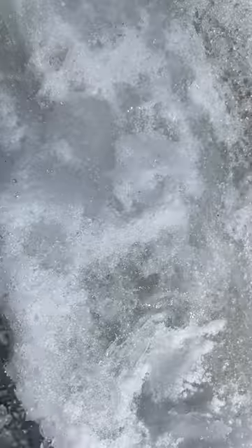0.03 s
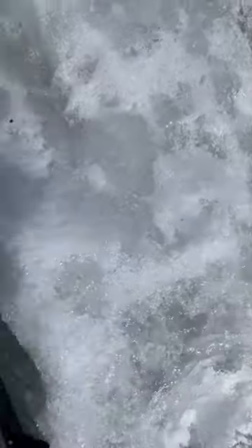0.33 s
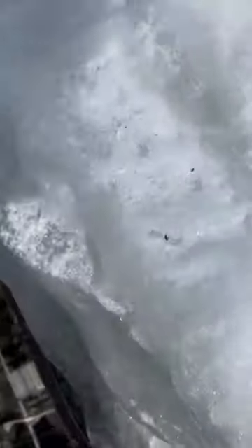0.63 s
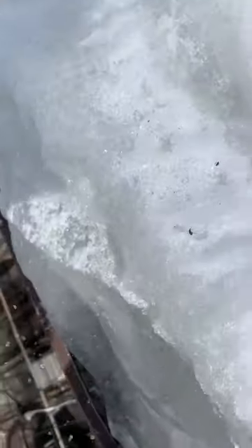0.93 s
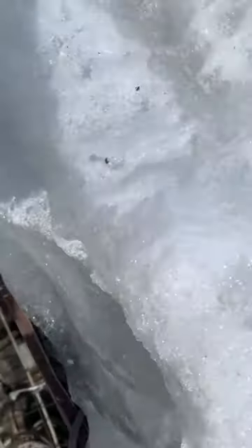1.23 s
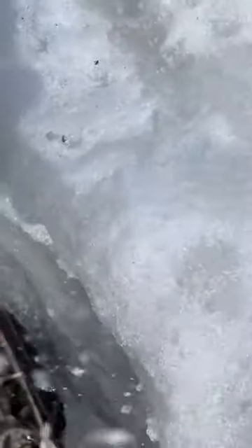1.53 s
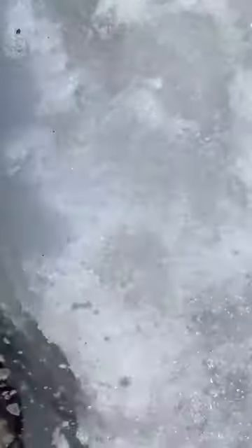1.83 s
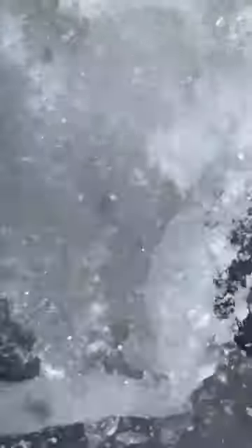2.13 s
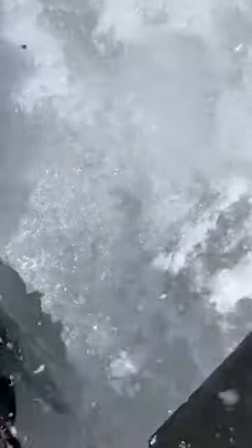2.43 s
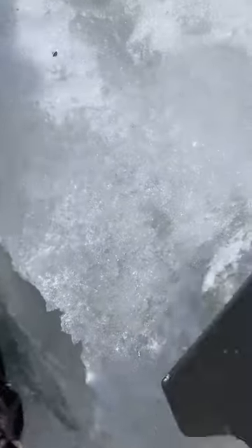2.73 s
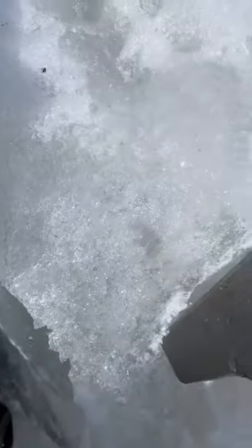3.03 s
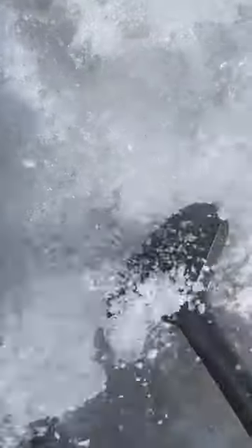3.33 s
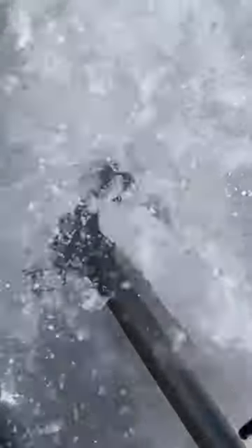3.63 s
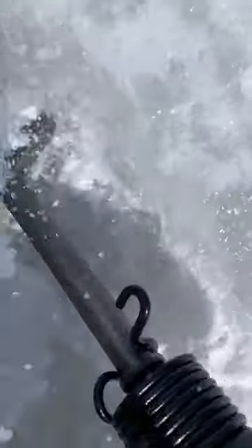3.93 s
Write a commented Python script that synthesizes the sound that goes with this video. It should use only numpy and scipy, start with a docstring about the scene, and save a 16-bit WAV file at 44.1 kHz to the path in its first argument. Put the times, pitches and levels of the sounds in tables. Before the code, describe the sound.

An air chisel rattles harshly into ice, pauses as crumbs fall, then restarts.

```python
"""A pneumatic chisel hammers thick ice, mostly at 65-85 blows a second; it falters, stops and restarts.
Each blow cracks the ice, puffs out air and rings the steel: a short clink when the blade is seated,
a shrill ring when it is free. In the pause crumbs tick down and grit slides; on the restart a slab drops.
Heard outdoors on a pair of microphones, the left one leading, with an engine humming in the distance."""
import sys
import numpy as np
from scipy import signal
from scipy.fft import rfft, irfft
from scipy.io import wavfile
from scipy.ndimage import uniform_filter1d

SR = 44100
rng = np.random.default_rng(int(sys.argv[2]) if len(sys.argv) > 2 else 0)


def unload_wav(signal):
    """Save mono or channel-first audio to the path in sys.argv[1] as 16-bit WAV at rate SR, clipped to [-1, 1]."""
    wavfile.write(
        sys.argv[1],
        SR,
        np.round(np.clip(np.atleast_2d(signal).T, -1, 1) * 32767).astype(np.int16),
    )


N = 176400
T, HZ = np.arange(N) / SR, np.fft.rfftfreq(N, 1 / SR)
# how far the left microphone leads the right (frequency [Hz], phase [rad])
LEFT_LEAD = [(0, 0), (500, 0), (1200, 1.4), (2500, 2.5), (3600, 1.8), (4700, 3.14), (6650, 6.28),
             (7400, 6.8), (8900, 9.42), (10900, 12.57), (11600, 13.3), (13100, 15.7), (15100, 18.85),
             (16000, 19.3)]
# strength of the exhaust, one list for each run of the chisel (time [s], relative level [dB])
EXHAUST_LEVEL = [
    [(0.04, -39), (0.62, -46), (0.69, -37.5), (0.82, -40.5), (0.91, -52), (1.05, -34.5), (2.22, -36),
     (2.27, -66)],
    [(3.135, -67), (3.149, -43.5), (3.169, -28), (3.271, -27), (3.283, -34), (3.99, -37)],
]
# strength of the cracking, one list for each run (time [s], relative level [dB])
CRACK_LEVEL = [
    [(0.04, -40), (0.52, -51), (0.77, -39), (0.91, -59.5), (1.05, -36.5), (2.21, -40), (2.27, -70)],
    [(3.135, -63), (3.181, -28), (3.213, -38.5), (3.641, -33), (3.773, -38), (3.99, -35)],
]


def amp(db):
    """Decibels to gain."""
    return 10 ** (np.asarray(db) / 20)


def unit_rms(x):
    """Scales to rms 1."""
    return x / np.sqrt(np.mean(x ** 2) + 1e-20)


def curve(rows, t, column=1):
    """Interpolates one column of a table at t."""
    rows = np.array(rows)
    return np.interp(t, rows[:, 0], rows[:, column])


def since(start):
    """Seconds since start; zero before it."""
    return np.maximum(T - start, 0)


def over_hz(points):
    """Interpolates a table on a log-frequency axis."""
    hz, value = np.transpose(points)
    return np.interp(np.log(HZ + 1), np.log(hz), value)


def coloured(x, spectrum):
    """Gives a white sound a spectrum and keeps its power."""
    return irfft(rfft(x) * unit_rms(amp(over_hz(spectrum))), N)


def noise(grain_db=0, size=14):
    """Two unrelated noises that share grains of uneven strength."""
    grains = np.repeat(rng.standard_normal(N // size + 1), size)[:N]
    return unit_rms(rng.standard_normal((2, N)) * amp(grain_db * np.minimum(grains, 2.5)))


def microphones(x):
    """Two noises reach the pair partly alike, the left leading."""
    # likeness of the channels (frequency [Hz], coherence [0-1])
    likeness = [(40, .985), (100, .95), (200, .88), (380, .7), (700, .2), (1500, .2), (2600, .5),
                (3800, .7), (4700, .93), (6000, .85), (9000, .95), (11000, .9), (13100, .93), (15500, .92)]
    same = np.clip(over_hz(likeness), 0, 1)
    left, other = rfft(x)
    right = (same * left + np.sqrt(1 - same ** 2) * other) * np.exp(-1j * curve(LEFT_LEAD, HZ))
    return irfft(np.array([left, right]), N)


def direct(x):
    """One clean sound as it reaches both microphones."""
    return np.array([x, irfft(rfft(x) * np.exp(-1j * curve(LEFT_LEAD, HZ)), N)])


def still_air():
    """The faint, low hush of the open air."""
    # (frequency [Hz], relative density [dB])
    spectrum = [(20, 4.5), (70, 3.5), (200, -11.5), (600, -14.5), (2000, -20.5), (15000, -29.5)]
    return amp(-73.5) * coloured(noise(), spectrum)


def engine(hz=60.2):
    """A distant engine hums at a steady speed."""
    # engine orders (multiple, relative level [dB])
    orders = [(1, -70), (2, -77), (3, -77), (5, -74.5), (6, -84), (7, -81.5), (8, -79.5), (9, -87.5)]
    # swell of the hum (time [s], gain [dB])
    level = [(.03, -27), (.15, -2.5), (2.7, -4), (2.9, 1.5), (3.1, 0.5)]
    hum = sum(amp(db) * np.sin(2 * np.pi * (order * hz * T + rng.random())) for order, db in orders)
    return np.sqrt(2) * hum * amp(curve(level, T))


def piston(jitter_s=.00012, early_s=.0006):
    """One blow a cycle. Returns the blow times and, for every sample, the last blow and its age."""
    # hammer speed, one list for each run (time [s], rate [blows/s])
    paces = [
        [(0.0355, 83.3), (0.076, 64.9), (0.196, 85.2), (0.467, 68.8), (0.623, 86.5), (0.659, 75.7),
         (0.777, 80.3), (0.881, 31.9), (1.003, 68.6), (1.079, 87.0), (1.188, 77.3), (1.227, 82.9),
         (1.346, 66.9), (1.387, 74.3), (1.511, 72.8), (1.641, 65.1), (2.007, 66.5), (2.1, 62.2), (2.144, 74.1),
         (2.265, 40.8)],
        [(3.133, 50.0), (3.18, 79.4), (3.384, 67.0), (3.426, 72.7), (3.516, 62.9), (3.981, 65.9)],
    ]
    times = []
    for pace in paces:
        t = np.arange(pace[0][0], pace[-1][0] + .006, 1 / SR)
        cycles = np.cumsum(curve(pace, t)) / SR
        times.extend(np.interp(np.arange(int(cycles[-1]) + 1), cycles, t))
    times = np.array(times) + scatter(times, jitter_s) - early_s
    last = np.maximum(np.searchsorted(times, T) - 1, 0)
    return times, last, since(times[last])


def scatter(times, spread):
    """One random offset for each blow."""
    return spread * rng.standard_normal(len(times))


def release(age):
    """A blow dies away if no other follows within 16 ms."""
    return np.exp(-np.maximum(age - .016, 0) / .006)


def levelled(blows, shape, runs, scatter_db):
    """Sets the rms of each blow's first 15 ms by a level table and the blade's grip."""
    # the blade slips or bites harder (time [s], half length [s], gain [dB])
    grips = [(0.471, 0.02, -12.5), (0.682, 0.02, 2), (0.966, 0.0065, 9.5)]
    times, last, age = blows
    grip_db = sum(db * np.exp(-((times - at) / half) ** 4) for at, half, db in grips)
    level_db = curve(runs[0] + runs[1], times + .0044) + grip_db + scatter(times, scatter_db)
    working = (age > 0) & (age < .015)
    power = np.bincount(last, shape ** 2 * working) / np.bincount(last, working)
    return (amp(level_db) / np.sqrt(power + 1e-20))[last] * shape * release(age)


def exhaust_swell(age, peak_s=.0054):
    """The rise and fall of the air vented on one blow."""
    return age / peak_s * np.exp(-(age / peak_s) ** 2 / 2)


def exhaust_puff(blows, top_hz=982, end_hz=174.2, sag_s=.003136):
    """Each blow vents a puff of air whose pitch falls fast."""
    times, last, age = blows
    envelope = amp(-4.5) * levelled(blows, exhaust_swell(age), EXHAUST_LEVEL, scatter_db=1.3)
    cycles = end_hz * age + (top_hz - end_hz) * sag_s * (1 - np.exp(-age / sag_s))
    detune = 1 + scatter(times, .04)[last]
    return envelope * np.sqrt(2) * np.sin(2 * np.pi * cycles * detune)


def breaking_ice(blows, grain_db=5.5):
    """Each blow gives a rumble, a knock, a crack, a treble burst and a spray of air and ice dust."""
    # spectra of these five (frequency [Hz], relative density [dB])
    rumble_colour = [(20, -20.5), (40, -2.5), (56, -3), (90, -0.5), (140, 0.5), (300, -7), (500, -3.5),
                     (900, -14.5), (3000, -55)]
    knock_colour = [(200, -19.5), (450, -6), (650, 4), (1100, 1.5), (1400, -5.5), (2000, -45.5),
                    (5000, -56.5)]
    crack_colour = [(700, -35), (1400, 0.5), (1900, 1), (2600, -1.5), (3800, 1), (4800, -9.5), (6000, -4),
                    (9000, -25.5)]
    treble_colour = [(3500, -72.5), (5300, -1), (6800, 0), (7350, 6.5), (8000, 2.5), (9300, -13.5),
                     (10800, 6), (12300, 4), (14000, -6.5)]
    spray_colour = [(11500, -36), (13900, -5), (15500, -8)]
    # strength of knock and treble, one list for each run (time [s], relative level [dB])
    knock_level = [
        [(0.04, -45.5), (0.25, -40.5), (0.84, -51.5), (0.87, -79.5), (1.07, -37), (2.21, -40.5), (2.27, -79.5)],
        [(3.135, -88), (3.16, -33.5), (3.223, -39), (3.693, -36.5), (3.811, -39.5), (3.99, -36)],
    ]
    treble_level = [
        [(0.04, -41.5), (0.86, -46), (0.89, -57.5), (1.05, -37.5), (2.2, -37), (2.27, -61.5)],
        [(3.135, -58.5), (3.153, -35), (3.547, -34), (3.583, -31.5), (3.907, -37.5), (3.99, -35.5)],
    ]
    # lift of the spray over treble_level (time [s], gain [dB])
    spray_lift = [(.8, 11), (1.05, 1.9)]
    times, last, age = blows

    def burst(level, fade_s, crumble, scatter_db):
        """A sharp fracture with a crumbling tail."""
        shape = (1 - np.exp(-age / .0016)) * (np.exp(-age / fade_s) + crumble * np.exp(-age / .038))
        return levelled(blows, shape, level, scatter_db)

    def recurring(share, grain_db=0):
        """Noise that partly recurs on each blow and changes slowly as the blade digs in."""
        shapes = signal.lfilter([1], [1, -.9], rng.standard_normal((2, len(times), 1024)), axis=1)
        again = unit_rms(shapes[:, last, np.round(age * SR).astype(int) % shapes.shape[2]])
        return np.sqrt(share) * again + np.sqrt(1 - share) * noise(grain_db)

    held_swell = exhaust_swell(age) + .35 * (age > 0)
    rumble = recurring(.35) * levelled(blows, held_swell, EXHAUST_LEVEL, scatter_db=1.8)
    knock = recurring(.55) * burst(knock_level, fade_s=.0019, crumble=.09, scatter_db=.5)
    crack = recurring(.3, grain_db) * burst(CRACK_LEVEL, fade_s=.0012, crumble=.2, scatter_db=1.4)
    treble = noise(grain_db) * burst(treble_level, fade_s=.0018, crumble=.23, scatter_db=2.5)
    spray = noise(grain_db) * burst(treble_level, fade_s=.0012, crumble=.14, scatter_db=2)
    return (amp(-1) * coloured(rumble, rumble_colour)
            + amp(-.5) * coloured(knock, knock_colour)
            + amp(4.5) * coloured(crack, crack_colour)
            + amp(7.5) * coloured(treble, treble_colour)
            + amp(curve(spray_lift, T)) * coloured(spray, spray_colour))


def chatter(rough):
    """The steel rattles against the ice, which shakes the level and phase of its tone."""
    real, imaginary = unit_rms(uniform_filter1d(rng.standard_normal((2, N)), size=70))
    return (1 + rough * (real + 1j * imaginary) / np.sqrt(2)) / np.sqrt(1 + rough ** 2)


def seated(blows, tail, delay_s=.0016, width_s=.0008):
    """Solid ice stops the blade at once, trading its ringing tail for one hard snap."""
    # hold of the ice on the blade (time [s], bite [0-1])
    bite = [(.21, 0.73), (.46, 0.25), (1.3, 0.4), (1.55, 0.1)]
    times, last, age = blows
    share = curve(bite, times)[last] ** 2
    snap = np.exp(-((age - delay_s) / width_s) ** 2) * (age > 0)
    return share * snap + (1 - share) * tail


def blade_clink(blows, delay_s=.0016, rise_s=.0017, bend_hz=349, scatter_hz=111.5):
    """The struck blade clinks, higher and longer as the ice loosens."""
    # the blade's note (time [s], base pitch [Hz], fade [s])
    note = [(.7, 9870, 0.0022), (1.45, 9870, 0.0022), (1.7, 10140, 0.004), (3.6, 10110, 0.016)]
    # its strength, one list for each run (time [s], relative level [dB])
    level = [
        [(0.04, -59), (0.05, -32.5), (0.15, -33), (0.16, -26.5), (0.82, -32.5), (0.9, -54.5), (1.01, -33),
         (2.23, -36), (2.27, -66)],
        [(3.135, -59), (3.153, -38), (3.175, -27), (3.223, -34), (3.443, -26), (3.539, -42), (3.567, -26),
         (3.99, -41)],
    ]
    times, last, age = blows
    after = np.maximum(age - delay_s, 0)
    settle = np.exp(-after / rise_s)
    rebound = 2 * (1 - settle) * np.exp(-after / curve(note, T, column=2))
    rebound *= amp(scatter(times, 3.3))[last]
    hz = curve(note, T) + scatter(times, scatter_hz)[last] + bend_hz * settle
    phase = 2 * np.pi * np.cumsum(hz) / SR
    tone = chatter(rough=.55) * np.exp(1j * (phase + scatter(times, np.pi)[last]))
    envelope = amp(1.5) * levelled(blows, seated(blows, rebound), level, scatter_db=1.5)
    return envelope * np.sqrt(2) * tone.real


def blade_ring(blows, hz=11567, rise_s=.0025, fade_s=.026, jam_chance=.15, jam_db=-18, slip_rad=2):
    """The blade rings shrilly between blows, unless a blow jams it in the ice."""
    # strength of the ring (time [s], relative level [dB])
    level = [(0, -36), (.43, -29), (.465, -55), (.485, -36), (.51, -37), (.81, -35), (.87, -59), (1, -52.5),
             (1.6, -32), (1.62, 7.5), (1.75, -11), (1.82, -40.5), (1.96, -13.5), (2.05, -15), (2.1, -21.5),
             (2.17, -16.5), (2.21, -12), (2.26, -57.5), (3.135, -48), (3.17, -20), (3.54, -21), (3.67, -19),
             (3.78, -29), (3.99, -20)]
    # blows on which the blade springs free (time [s], relative level [dB])
    free_blows = [(.062, -16), (.077, -16), (.092, -13.5), (.12, -12.5), (.148, -14.5), (.384, -19.5),
                  (.458, -18), (.537, -15.5), (.766, -22), (1.128, -18), (1.201, -17.5), (1.277, -14),
                  (1.307, -18), (1.363, -17.5), (1.402, -17), (1.444, -15), (1.484, -15), (1.524, -11),
                  (1.54, -11.5), (1.568, -14), (1.583, -13.5), (3.152, -14.5), (3.192, -11), (3.301, -12.5),
                  (3.326, -13), (3.355, -9.5), (3.386, -11.5), (3.501, -11.5), (3.66, -12), (3.674, -14)]
    times, last, age = blows
    ring_db = curve(level, times) + scatter(times, 3)
    jammed = rng.random(len(times)) < jam_chance
    ring_db = np.minimum(ring_db + jam_db * jammed, -15)
    for at, db in free_blows:
        ring_db[np.argmin(abs(times - at))] = db
    tail = (1 - np.exp(-(age / rise_s) ** 2)) * np.exp(-age / fade_s) * release(age)
    envelope = amp(ring_db + .5)[last] * seated(blows, tail)
    slip = np.exp(1j * np.cumsum(scatter(times, slip_rad)))[last]
    smoothed = uniform_filter1d(envelope * slip, size=50)
    return (smoothed * chatter(rough=.25) * np.exp(2j * np.pi * hz * T)).real


def ice_chip(blows, centre_hz=1450, spread_octaves=.45, fade_s=.0015, delay_s=.0012):
    """A splinter snaps off on each blow and rings briefly, at its own pitch and moment."""
    times, last, age = blows
    t = np.maximum(age - abs(scatter(times, delay_s))[last], 0)
    hz = centre_hz * 2 ** scatter(times, spread_octaves)[last]
    tone = np.exp(-t / fade_s) * np.sin(2 * np.pi * hz * t)
    return amp(-5.5) * levelled(blows, tone, CRACK_LEVEL, scatter_db=1.6)


def shank(hz=7225, t60_s=.14):
    """A few blows leave the shank singing in a lower, longer mode of the steel."""
    # (time [s], level [dB])
    strikes = [(0.076, -25.5), (0.675, -31), (0.768, -27.5), (0.833, -22.5), (1.05, -23.5)]
    return sum(amp(db - 60 * since(at) / t60_s) * np.sin(2 * np.pi * hz * since(at))
               for at, db in strikes)


def hollow_pop(blows, hz=1080, width_s=.00075, delay_s=.0012):
    """Blows pop hollowly while the blade sits in solid ice."""
    # peak of the pop's envelope (time [s], level [dB])
    level = [(.15, -67), (.27, -23.5), (.33, -24.5), (.42, -29.5), (.47, -71), (.52, -28), (.59, -48),
             (.65, -65.5)]
    times, last, age = blows
    t = age - delay_s
    envelope = amp(curve(level, times))[last] * np.exp(-(t / width_s) ** 2)
    return envelope * np.sin(2 * np.pi * hz * t) * (age > 0)


def grit():
    """Fine grit slides with a faint, grainy hiss."""
    # (time [s], level [dB])
    level = [(0, -130), (2.2, -84), (2.4, -84), (2.57, -80), (2.8, -71), (2.91, -67), (3.02, -77),
             (3.12, -68)]
    # (frequency [Hz], relative density [dB])
    spectrum = [(100, -4.5), (500, -2), (1500, 0.5), (3500, -1), (7200, 1.5), (9000, -3), (11500, -7.5),
                (15500, 0)]
    return amp(curve(level, T)) * coloured(noise(grain_db=6), spectrum)


def crumbs(fade_s=.0022, skitter_s=.028, split_hz=4000):
    """Ice crumbs land in the pause with a tick and skitter on."""
    # (time [s], relative level [dB], treble against the middle [dB])
    landings = [(2.342, -53, -12.5), (2.42, -59, -8), (2.449, -53.5, -15), (2.507, -56.5, -9),
                (2.55, -50.5, -7.5), (2.663, -50.5, -13), (2.845, -54.5, -4), (2.902, -56, 2.5),
                (2.946, -49, -16), (2.97, -66.5, 5)]
    # (frequency [Hz], relative density [dB])
    spectrum = [(200, -3), (700, -9.5), (1800, -1.5), (3000, -2.5), (7000, 5.5), (9500, -4), (11500, 3),
                (15500, -14)]
    middle, treble = np.zeros((2, N))
    for at, db, treble_db in landings:
        decay = np.exp(-since(at) / fade_s) + .94 * np.exp(-since(at) / skitter_s)
        tick = amp(db - 4.5) * (T > at) * decay
        middle += tick
        treble += amp(treble_db) * tick
    grains = noise(grain_db=3.5, size=30)
    low = signal.lfilter(*signal.butter(2, split_hz, fs=SR), grains)
    return coloured(middle * low + treble * (grains - low), spectrum)


def lumps(fade_s=.0023):
    """Larger lumps land on the ice with a short hollow click."""
    # (time [s], relative level [dB])
    landings = [(2.847, -66), (2.947, -53)]
    # (frequency [Hz], gain [dB])
    modes = [(1250, -0.3), (1900, -1.7)]
    return sum(amp(db + mode_db) * np.exp(-since(at) / fade_s) * np.sin(2 * np.pi * hz * since(at))
               for at, db in landings for hz, mode_db in modes)


def slab(rise_s=.0036, fade_s=.016):
    """A slab of ice breaks off and drops with two thuds."""
    # (time [s], relative level [dB])
    thuds = [(3.19, -20), (3.254, -16)]
    # (frequency [Hz], relative density [dB])
    spectrum = [(20, -9), (55, 5), (110, -15), (280, -18), (600, -13.5), (3000, -58)]
    envelope = sum(amp(db) * (1 - np.exp(-since(at) / rise_s)) * np.exp(-since(at) / fade_s)
                   for at, db in thuds)
    return envelope * coloured(noise(), spectrum)


def scene():
    """Steel and ice reach the left microphone first; exhaust and distant engine sit in the centre."""
    blows = piston()
    puffs = exhaust_puff(blows)
    ice = breaking_ice(blows)
    steel = blade_clink(blows) + blade_ring(blows) + shank()
    clicks = ice_chip(blows) + ice_chip(blows) + hollow_pop(blows) + lumps()
    centre = puffs + engine()
    debris = crumbs() + slab() + grit()
    return centre + direct(steel + clicks) + microphones(ice + debris + still_air())


def record(dry):
    """The microphones cut the bass below 38 Hz; the band ends at 15.8 kHz."""
    dry = signal.sosfilt(signal.butter(2, 38, "highpass", fs=SR, output="sos"), dry)
    band_limit = signal.firwin(511, 15800, window=("kaiser", 9), fs=SR)
    return signal.oaconvolve(dry, band_limit[None], "same")


dry = scene()
out = record(dry)
unload_wav(out)
```